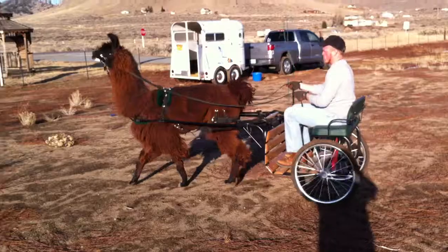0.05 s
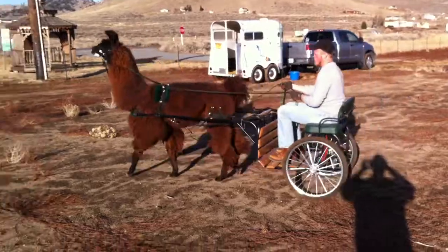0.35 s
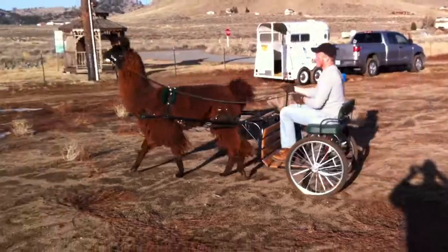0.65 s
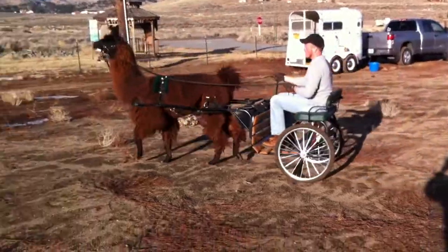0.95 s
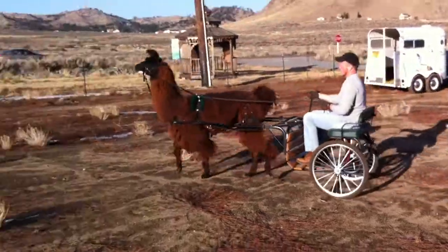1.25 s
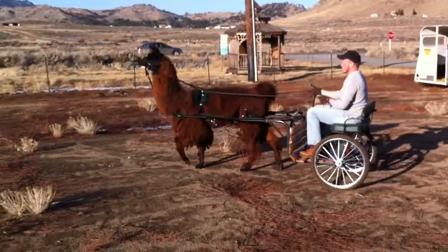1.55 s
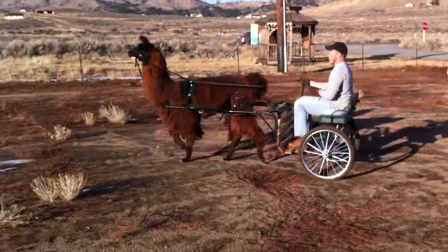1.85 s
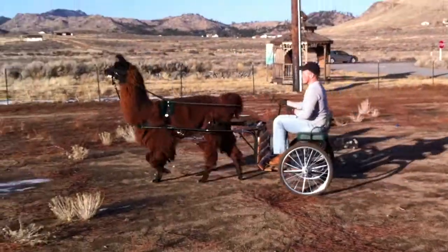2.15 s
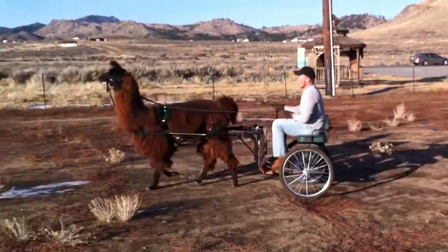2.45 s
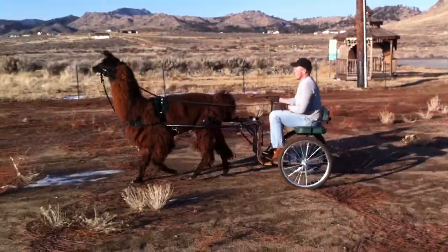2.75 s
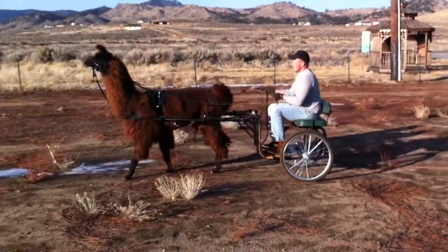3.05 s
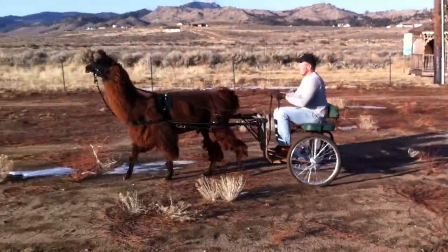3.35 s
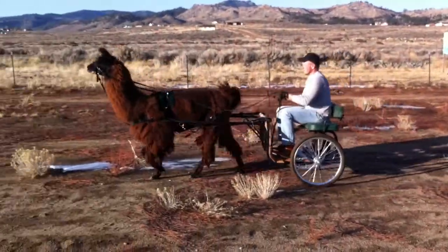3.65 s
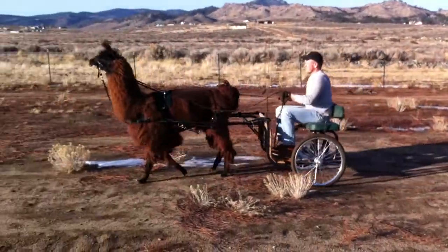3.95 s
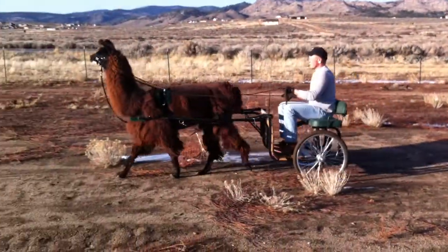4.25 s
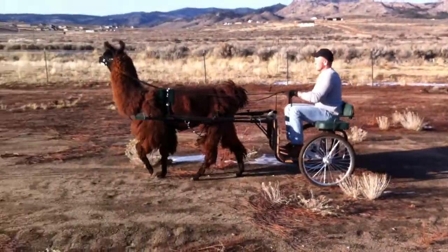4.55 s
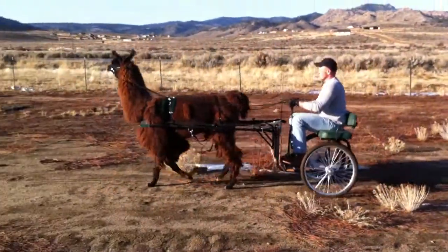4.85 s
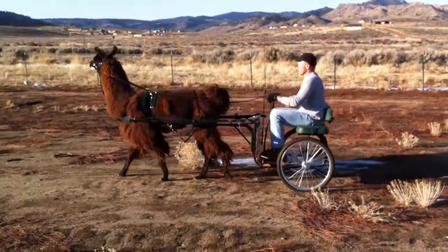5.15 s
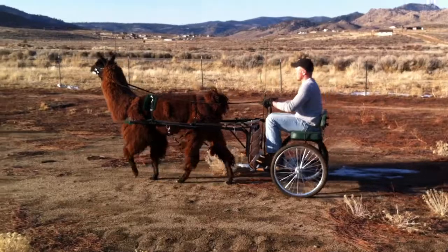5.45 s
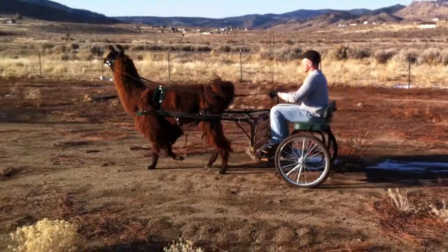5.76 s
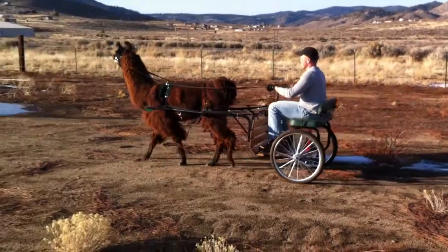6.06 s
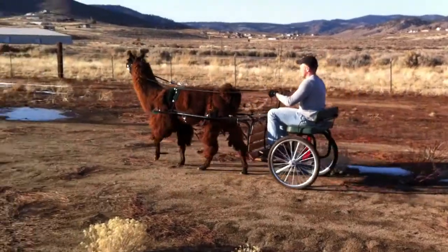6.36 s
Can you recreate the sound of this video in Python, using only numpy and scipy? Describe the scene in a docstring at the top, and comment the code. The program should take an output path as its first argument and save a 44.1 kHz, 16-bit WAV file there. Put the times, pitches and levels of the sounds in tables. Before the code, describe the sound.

From the start, a two-wheeled cart drawn by a llama rolls over a dry dirt lot, with a low rumble, crunching grit, faint swishing weeds and tiny snaps of twigs and stones. The cart knocks lightly over ruts until about 3.4 seconds and judders briefly between 0.8 and 1.7. Padded feet thud softly and unevenly until about 4 seconds, with faint scuffs continuing later. Small harness fittings clink and jingle now and then, clearest near 0.7 and 2.4, ending by 3.8. Behind everything, the tyres of cars roar and hum on a distant road, swelling near 3 seconds and growing duller. The cart slowly becomes softer as it moves away. At about 4.4 seconds the microphone takes one dull knock. Low, irregular wind buffets follow, strongest around 5 seconds and again near 6, over the continuing crunch and traffic until the end at about 6.4.

```python
"""A llama walks a two-wheeled cart over a dry dirt lot, moving off from the microphone.
Padded feet thud and scuff, ruts shake the frame, grit crunches and snaps, harness fittings clink.
Farther off, the tyres of two cars roar on a country road, dulled by air and coloured by the ground.
Near the end the camera takes one knock, and eddies of wind buffet the microphone."""
import sys
import numpy as np
from scipy import signal
from scipy.fft import rfft, irfft
from scipy.io import wavfile
from scipy.ndimage import uniform_filter1d

SR = 44100
rng = np.random.default_rng(int(sys.argv[2]) if len(sys.argv) > 2 else 0)


def materialize(psi):
    """Save the field psi as 16-bit PCM at rate SR to the path in sys.argv[1].

    A 1-D psi becomes a single channel; in a 2-D psi each row is a channel.
    """
    bounded = np.clip(np.atleast_2d(psi).T, -1, 1)
    quanta = np.round(bounded * 32767).astype(np.int16)
    wavfile.write(sys.argv[1], SR, quanta)


N = 283122
TIME = np.arange(N) / SR
FRAME, HOP = 1024, 256  # samples per short-time spectrum, and between spectra
BINS = np.fft.rfftfreq(FRAME, 1 / SR)
FRAME_TIMES = np.arange(N // HOP + 5)[:, None] * HOP / SR


def amp(db):
    """Decibels to gain."""
    return 10 ** (np.asarray(db) / 20)


def unit(x):
    """Scales to an rms of one."""
    return x / np.sqrt(np.mean(x ** 2) + 1e-20)


def colour(points, hz):
    """Reads a spectrum in dB on a log-frequency axis."""
    f, db = np.transpose(points)
    return np.interp(np.log(hz + 1), np.log(f + 1), db)


def follow(rows, t):
    """Reads every column of a curve table at the times t."""
    s, *columns = np.transpose(rows)
    return [np.interp(t, s, c) for c in columns]


def shaped(x, points):
    """Filters x by a spectrum; rms one."""
    gain = amp(colour(points, np.fft.rfftfreq(N, 1 / SR)))
    return unit(irfft(rfft(x) * gain, N))


def add(mix, s, sound):
    """Adds a sound to the mix at time s."""
    part = mix[max(round(s * SR), 0):][:len(sound)]
    part += sound[:len(part)]


def grains(per_s, spread_db):
    """Random clicks, most small and a few large."""
    clicks = (rng.random(N) < per_s / SR) * rng.choice([-1, 1], N)
    sizes = amp(spread_db * np.minimum(rng.exponential(1, N), 4))
    return unit(clicks * sizes)


def flutter(size):
    """Slow random motion of rms one, smooth over size samples."""
    return unit(uniform_filter1d(uniform_filter1d(rng.standard_normal(N), size), size))


def bell(hz, octaves):
    """A bell curve on the log-frequency axis."""
    return np.exp(-.5 * (np.log2((BINS + 1) / hz) / octaves) ** 2)


def band_db(db, lo, hi):
    """Power of short-time spectra between two frequencies, in dB."""
    inside = (BINS > lo) & (BINS < hi)
    return 10 * np.log10((amp(db[:, inside]) ** 2).sum(1, keepdims=True))


def noise_of(db, patchy_db):
    """Noise whose short-time spectra follow a mottled field of dB per bin."""
    real, imag, patches = rng.standard_normal((3, len(FRAME_TIMES), len(BINS)))
    patches = unit(uniform_filter1d(uniform_filter1d(patches, size=18, axis=0), size=4, axis=1))
    spectra = (real + 1j * imag) * amp(db + patchy_db * patches)
    sound = signal.istft(spectra.T, nperseg=FRAME, noverlap=FRAME - HOP)[1][:N]
    return unit(sound) * np.sqrt((amp(db) ** 2).sum(1).mean())


def band_noise(db, hz, octaves):
    """A band of noise around hz at a level in dB per frame."""
    band = 20 * np.log10(bell(hz, octaves) + 1e-6) + np.zeros_like(FRAME_TIMES)
    return noise_of(band - band_db(band, 0, SR / 2) + db, patchy_db=1.5)


def swish(start_s, end_s, level_db, hz, sag_hz_per_s, octaves, fade_s):
    """A band of noise that fades in, holds while its pitch drifts, and fades out."""
    t = FRAME_TIMES
    gate = np.clip(np.minimum(t - start_s, end_s - t) / fade_s, 1e-4, 1)
    pitch = hz - sag_hz_per_s * (np.clip(t, start_s, end_s) - start_s)
    return band_noise(level_db + 20 * np.log10(gate), pitch, octaves)


def burst(hz, octaves, envelope):
    """A puff of noise around hz under an envelope, eased in over one cycle."""
    count = len(envelope)
    f = np.fft.rfftfreq(2 * count, 1 / SR)
    band = np.exp(-.5 * (np.log2((f + 1) / hz) / octaves) ** 2)
    puff = irfft(rfft(rng.standard_normal(count) * envelope, 2 * count) * band)[:count]
    ease = np.sin(np.pi / 2 * np.minimum(np.arange(count) * hz / SR, 1)) ** 2
    return ease * puff / abs(puff).max()


def puffs(rows, gain_db, octaves, rise):
    """Toneless pushes that swell for the share rise of their length, then die."""
    out, t = np.zeros(N), np.arange(SR // 8) / SR
    for s, db, hz, length_s in rows:
        age = t / max(length_s * rise, .001)
        add(out, s, amp(db + gain_db) * burst(hz, octaves, age ** 2 * np.exp(-2 * age)))
    return out


def swings(rows, gain_db, sag, ragged, tail):
    """Low pushes that swing a few times as their pitch sags; tail is decay time over rise time."""
    out, t = np.zeros(N), np.arange(-SR // 16, SR // 16) / SR
    for s, db, hz, cycles in rows:
        age = 2 * t * hz / cycles  # zero at the peak
        envelope = 1 / np.cosh(np.where(age < 0, 2 * age, 2 * age / tail))
        turns = np.cumsum(hz * (1 - sag * np.tanh(age))) / SR + rng.random()
        roughness = ragged * burst(2 * hz, octaves=0.32, envelope=envelope)
        push = envelope * np.sin(2 * np.pi * turns) + roughness
        add(out, s + t[0], amp(db + gain_db) * push * signal.windows.tukey(len(t)))
    return out


def ring(modes, t, detune=0):
    """Decaying modes struck at t = 0; peak one."""
    hz, db, t60 = np.transpose(modes)[:, :, None]
    hz = hz * (1 + detune * rng.standard_normal(hz.shape))
    sound = (amp(db) * np.exp(-np.log(1000) * t / t60) * np.sin(2 * np.pi * hz * t)).sum(0)
    return sound / abs(sound).max()


def chatter(modes, bounce_db, bounce_s):
    """Metal strikes metal and bounces three times, each touch exciting the modes differently."""
    t = np.arange(SR // 5) / SR
    out = np.zeros(len(t))
    gaps = bounce_s * rng.uniform(0.64, 2.4, size=3)
    for k, delay in enumerate(np.append(0, np.cumsum(gaps))):
        touched = [(hz, db + 3 * rng.standard_normal(), t60) for hz, db, t60 in modes]
        add(out, delay, amp(k * bounce_db) * ring(touched, t, detune=0.0048))
    return out


def rattle(modes, length_s, touches_per_s, sag_db):
    """A quick run of uneven touches, each ringing the metal's damped modes anew; peak one."""
    t = np.arange(SR // 12) / SR
    out, count = np.zeros(len(t)), max(round(length_s * touches_per_s), 2)
    for k in range(count):
        delay = (k + rng.random() * (k > 0)) / touches_per_s
        touched = [(hz, db + 3 * rng.standard_normal(), t60) for hz, db, t60 in modes]
        strength = amp(sag_db * k / count + rng.standard_normal())
        add(out, delay, strength * ring(touched, t, detune=0.013))
    return out / abs(out).max()


# Spectrum of the microphone's noise floor: f/Hz, level/dB
HISS_SPECTRUM = [(1000, -33), (4500, -12), (6000, 7), (9000, 1), (11000, 7), (12300, 10), (14000, 2),
                 (15300, 18), (16000, -10)]

def hiss(level_db=-70.0):
    """The microphone's own steady hiss, behind everything."""
    return amp(level_db) * shaped(rng.standard_normal(N), HISS_SPECTRUM)


# Tyre spectra of the two cars, heard from the lot: f/Hz, level/dB
FIRST_TYRES = [(250, -43), (450, -14), (620, -9.5), (800, 0), (1000, -1.5), (1350, 0.5), (1550, -0.5),
               (1850, -3.5), (2250, -7.5), (2700, -16), (3200, -15), (5000, -20.5), (8000, -54)]
SECOND_TYRES = [(250, -23), (500, -18.5), (650, -8.5), (850, -2.5), (1000, 3), (1250, 3.5), (1550, 0.5),
                (1720, -6.5), (1900, -9.5), (2200, -11.5), (2700, -10), (4000, -17), (8000, -50)]
# One car takes over from the other: t/s, share of the second car
SECOND_SHARE = [(3.1, 0.21), (4.4, 0.84)]
# The roar's upper edge, sinking with distance: t/s, f/Hz
AIR_EDGE = [(0, 4110), (1.4, 3250), (2.0, 3000), (2.25, 2700), (2.6, 2900), (3.0, 2360), (3.4, 1820),
            (3.8, 1640)]

def tyres_db(fall_db_per_octave=27):
    """Blended spectra of both cars; the air on the way to the microphone dulls their top."""
    second, = follow(SECOND_SHARE, FRAME_TIMES)
    edge_hz, = follow(AIR_EDGE, FRAME_TIMES)
    blend = (1 - second) * colour(FIRST_TYRES, BINS) + second * colour(SECOND_TYRES, BINS)
    return blend - fall_db_per_octave * np.log2(np.maximum(BINS / edge_hz, 1))


# The roar's hollow-sounding centre: t/s, f/Hz, gain/dB
ECHO_CENTRE = [(0, 1180, -1.5), (.8, 1040, 8), (1.6, 1360, -0.5), (2.6, 1390, 2), (3.15, 1000, -0.5),
               (3.5, 890, 4.5), (4.6, 1100, 1), (5.2, 1320, 6), (6.42, 1330, -1.5)]
# The cancelled band above it: t/s, f/Hz, gain/dB
ECHO_NOTCH = [(2.1, 3700, -17), (2.7, 3320, -12), (3.02, 2730, -11), (3.15, 2600, -18), (3.25, 1300, 0),
              (3.9, 1420, -1), (4.6, 1640, -10.5), (4.95, 1720, -0.5), (5.25, 2470, -4), (5.6, 1880, -5),
              (6.0, 1880, -5.5), (6.42, 2070, -11)]

def ground_echo_db():
    """The echo off the ground between road and microphone colours the roar, drifting as the cars move."""
    centre_hz, height = follow(ECHO_CENTRE, FRAME_TIMES)
    notch_hz, depth = follow(ECHO_NOTCH, FRAME_TIMES)
    return height * bell(centre_hz, octaves=0.28) + depth * bell(notch_hz, octaves=0.13)


# Relative levels of the roar's bands: t/s, core level/dB, bright edge level/dB, low flank level/dB
ROAR_LEVELS = [(0.0, -45.5, -55, -59), (0.85, -46.5, -54, -54.5), (1.38, -45.5, -49.5, -50),
               (1.9, -43, -53, -55), (2.0, -41.5, -47.5, -54), (2.25, -47, -59, -49),
               (2.55, -40.5, -49.5, -46), (2.75, -39.5, -53.5, -47.5), (2.94, -37, -53.5, -47),
               (3.04, -41, -57.5, -53.5), (3.46, -46.5, -61.5, -45.5), (3.89, -48, -55.5, -53.5),
               (4.0, -44, -58.5, -54), (4.28, -48, -60, -53), (4.58, -43, -63, -58),
               (4.89, -46.5, -66, -57), (5.28, -43, -62.5, -55.5), (5.65, -43, -63.5, -57.5),
               (6.0, -45.5, -61.5, -55), (6.27, -44, -59.5, -56.5), (6.42, -45, -62.5, -52)]
# Soft ground swallowing the low middle: t/s, f/Hz, gain/dB
SOFT_GROUND = [(0, 520, -3), (1.4, 490, -4), (2.0, 431, -15), (2.8, 445, -15), (3.4, 450, -21),
               (4.0, 375, -3), (4.6, 440, 5)]

def road(gain_db=-0.9, edge_gain_db=1.08, flank_gain_db=-2.0):
    """Tyre roar from the road beyond the lot, mottled by turbulence on its way over."""
    core, edge, flank = follow(ROAR_LEVELS, FRAME_TIMES)
    hollow_hz, hollow_db = follow(SOFT_GROUND, FRAME_TIMES)
    db = tyres_db() + ground_echo_db()
    # the core carries the level; the bands on either side swell against it
    db += core - band_db(db, 850, 1700)
    brighter = edge - band_db(db, 1900, 3200) + edge_gain_db
    fuller = flank - band_db(db, 600, 850) + flank_gain_db
    db += brighter * colour([(1600, 0.0074), (2050, 0.89)], BINS)
    db += fuller * colour([(450, 0.19), (620, 1.0), (780, 1), (950, 0.01)], BINS)
    db += hollow_db * bell(hollow_hz, octaves=0.12)
    return noise_of(db + gain_db, patchy_db=1.24)


def car_drone(closest_s=2.83, passing_s=0.11, level_db=-52):
    """The first car's low drone reaches the microphone only while it is closest."""
    distance_db = -10 * np.log10(1 + ((FRAME_TIMES - closest_s) / passing_s) ** 2)
    return band_noise(level_db + distance_db, hz=290, octaves=0.19)


# Tread singing out on the road: start/s, end/s, level/dB, f/Hz, sag/(Hz/s), width/octaves
TREAD_BANDS = [(0.733, 1.603, -51, 938, 15, 0.024), (1.05, 2.15, -52, 1330, 34, 0.032),
               (2.99, 3.758, -49, 982, 0, 0.042), (3.705, 4.863, -54, 985, 0, 0.015),
               (3.95, 4.848, -56, 1267, 0, 0.038), (5.146, 5.55, -51, 1000, 0, 0.022),
               (5.192, 6.253, -52.5, 1253, 0, 0.058), (5.297, 6.425, -54, 1433, -40, 0.037)]

def tread():
    """The tread of the cars' tyres hums in narrow, wavering bands."""
    return sum(swish(*band, fade_s=0.16) for band in TREAD_BANDS)


# Eddies right at the microphone: t/s, relative level/dB, f/Hz, length/cycles
EDDIES = [(4.434, -49, 147, 2.7), (4.548, -34.5, 185.2, 1.2), (4.619, -41, 129, 1.8),
          (4.711, -35.5, 280, 2.3), (4.729, -30, 172.8, 3.2), (4.775, -47, 178, 3.9),
          (4.868, -41, 164.4, 1.8), (4.887, -36, 285, 3.9), (4.899, -29.5, 174, 3.8),
          (4.933, -29, 202.5, 1.2), (5.005, -20.5, 166.7, 1.3), (5.021, -25, 267.3, 2.7),
          (5.033, -30, 221.7, 2.7), (5.086, -39, 201, 3.5), (5.118, -29.5, 196.7, 2.2),
          (5.143, -38, 191, 7), (5.184, -40, 155.3, 3.1), (5.245, -49, 141, 2.8),
          (5.437, -39.5, 166.5, 1.3), (5.468, -36, 153, 2.3), (5.529, -45, 160.6, 3.5),
          (5.607, -48, 201, 1.7), (5.654, -39.5, 137.4, 2.8), (5.774, -39, 172, 2.1),
          (5.794, -41, 172, 2.6), (5.839, -42, 153, 2), (5.87, -32, 164, 3.6), (5.91, -34.5, 155.4, 2.3),
          (5.954, -40.5, 197, 4.4), (5.986, -30, 155, 2), (6.0, -42, 334, 3), (6.053, -32.5, 179, 1.1),
          (6.173, -37.5, 187, 2.7), (6.206, -39, 154, 1.3), (6.275, -50, 145, 6.6),
          (6.351, -38.5, 170, 2.1)]
# Spectrum of the turbulence around them: f/Hz, level/dB
WAKE_SPECTRUM = [(20, 7), (50, -15), (100, 5.5), (150, 4), (220, -6.5), (320, -8), (450, -28), (900, -52)]

def wind(wake_db=-47.5, wake_s=0.026, pivot_db=-41, growth=0.57, lumpy_db=3.5):
    """Each eddy swings the diaphragm in a wake of lumpy turbulence that grows with its strength."""
    wakes = [amp(wake_db + growth * (db - pivot_db)) * np.exp(-.5 * ((TIME - s) / wake_s) ** 2)
             for s, db, _, _ in EDDIES]
    turbulence = shaped(rng.standard_normal(N) * amp(lumpy_db * flutter(size=500)), WAKE_SPECTRUM)
    pushes = swings(EDDIES, gain_db=0.5, sag=0.1202, ragged=0.11, tail=0.81)
    return turbulence * np.max(wakes, axis=0) + pushes


# A knock on the camera: t/s, level/dB
CASE_TAPS = [(4.3862, -23)]
# Modes of its case: f/Hz, level/dB, t60/s
CASE_MODES = [(820, 23, 0.0044), (1700, 10, 0.0045), (2750, -5, 0.0026), (193, 10, 0.022)]

def camera_knock():
    """A dull, quickly damped tap reaches the microphone through the camera's case."""
    out, t = np.zeros(N), np.arange(SR // 20) / SR
    for s, db in CASE_TAPS:
        add(out, s, -amp(db) * ring(CASE_MODES, t))
    return out


# Weeds and dirt on the lot: start/s, end/s, level/dB, f/Hz, sag/(Hz/s), width/octaves
WEED_SCRAPES = [(0, .14, -60, 3840, 4, 0.3), (.15, .5, -67, 3580, 0, 0.15),
                (0.7, 1.597, -64.5, 3620, 102, 0.28), (1.146, 2.113, -65.5, 9400, 1200, 0.2),
                (1.845, 2.1, -66, 5000, 0, 0.57), (2.7, 3.023, -66.5, 4400, -3, 0.27),
                (3.023, 3.445, -68.5, 3860, 0, .22), (3.142, 3.346, -47.5, 1330, 0, 0.32),
                (4.22, 4.63, -66, 4450, 0, 0.73), (5.09, 5.415, -69.5, 3300, 0, 0.14)]

def weeds(catch_db=0.5):
    """Dry stalks and loose dirt swish along the wheels, catching and letting go."""
    swishes = sum(swish(*scrape, fade_s=0.065) for scrape in WEED_SCRAPES)
    return swishes * unit(amp(catch_db * flutter(size=90)))


# Sand crackling under the cart's tyres and the feet: t/s, level/dB
SAND_LEVEL = [(0, -73), (.6, -69), (1.3, -66), (1.7, -67), (2.15, -67.5), (2.7, -68), (3.1, -77),
              (3.8, -68), (4.5, -65.5), (4.85, -73), (5.3, -69), (5.7, -68), (6.05, -87), (6.42, -74)]
# The tick of each size of grain: f/Hz, relative level/dB
GRAIN_TICKS = [(3900, 1), (5600, -1.5), (7200, -10), (8800, -9), (10400, -5.5), (12600, -4), (14800, 2)]

def sand(clump_db=3.5, grain_s=0.00077):
    """Sand grains crack in clumps; each size of grain ticks at its own pitch."""
    ticks, t = np.zeros(N), np.arange(SR // 200) / SR
    clumps = amp(clump_db * flutter(size=700))
    for hz, db in GRAIN_TICKS:
        cracks = grains(per_s=750, spread_db=2.5) * clumps
        tick = burst(hz, octaves=0.2, envelope=np.exp(-t / grain_s))
        ticks += amp(db) * unit(signal.oaconvolve(cracks, tick)[:N])
    level_db, = follow(SAND_LEVEL, TIME)
    return unit(ticks) * amp(level_db)


# Stones and dry twigs breaking on the lot: t/s, relative level/dB, f/Hz
GROUND_SNAPS = [(.2074, -48, 12800), (.8625, -50, 13000), (1.2245, -52, 10000), (1.671, -47.5, 8900),
                (1.907, -52, 8200), (2.4074, -49, 14800), (2.4199, -42, 15400), (2.4423, -51, 12700),
                (2.4624, -41, 15000), (2.819, -46, 15000), (3.408, -41, 10200), (3.9937, -56, 7400),
                (5.1701, -50, 15000), (5.3994, -50, 15700), (5.676, -53, 7100), (5.68, -49, 13000),
                (5.8556, -46, 15100), (5.8674, -49, 15500), (5.922, -54, 5540), (5.923, -42, 14500),
                (6.0376, -46.5, 15600)]

def snaps(gain_db=6, crack_s=0.0013, crumble_db=-17, crumble_s=0.014):
    """A stone or twig gives with a sharp, bright crack and a short crumbling after it."""
    out, t = np.zeros(N), np.arange(SR // 25) / SR
    envelope = np.exp(-t / crack_s) + amp(crumble_db) * np.exp(-t / crumble_s)
    for s, db, hz in GROUND_SNAPS:
        add(out, s, amp(db + gain_db) * burst(hz, octaves=0.38, envelope=envelope))
    return out


def judder():
    """Ribbed ground keeps the cart's frame humming for a moment."""
    return swish(start_s=0.84, end_s=1.68, level_db=-54.5, hz=234,
                 sag_hz_per_s=25, octaves=0.21, fade_s=0.15)


# Knocks of the frame while the cart is still near: t/s, relative level/dB, f/Hz
FRAME_BUMPS = [(.124, -34, 480), (.205, -38, 445), (.308, -47, 450), (.42, -46, 400), (.751, -43, 330),
               (.856, -43, 337), (.919, -39.5, 486), (.993, -41, 420), (1.568, -37, 600), (1.646, -40, 520),
               (1.818, -33, 650), (1.928, -36, 670), (2.455, -39, 630), (2.47, -31, 1260), (2.9, -40, 710),
               (3.224, -29.5, 745), (3.226, -33, 1130), (3.367, -37, 706)]

def bumps(cycles=3.9):
    """The frame knocks over bumps; higher knocks die sooner."""
    knocks = [(s, db, hz, cycles / hz) for s, db, hz in FRAME_BUMPS]
    return puffs(knocks, gain_db=-3, octaves=0.33, rise=0.27)


# The cart rolls off onto smoother ground: t/s, relative rumble level/dB, relative crunch level/dB
CART_LEVELS = [(0, -50, -63.5), (.55, -52, -63), (1.0, -49.5, -62), (1.3, -58.5, -62.5), (1.7, -50.5, -64),
               (2.05, -52.5, -69), (2.2, -48.5, -64.5), (2.4, -52, -62), (2.6, -55, -63),
               (3.15, -54, -63.5), (3.6, -54.5, -63), (4.45, -59, -65), (4.8, -57.5, -66), (5.65, -57, -66),
               (6.1, -53.5, -70), (6.42, -51, -69)]
# Spectra of the ruts' rumble, the frame's boom and the dirt's crunch: f/Hz, level/dB
RUT_SPECTRUM = [(20, -3), (45, -14), (80, -7.5), (125, 0.5), (190, 3.5), (250, -3.5), (330, -18.5),
                (500, -20), (1000, -83)]
FRAME_SPECTRUM = [(100, -68), (195, -11), (228, 5), (290, -2), (350, -1.5), (450, -5), (520, -5.5),
                  (600, -9), (800, -18), (1600, -77)]
DIRT_SPECTRUM = [(1000, -28), (2400, 5.5), (3200, 9.5), (3900, 5), (4900, 4.5), (5700, 8.5), (7000, 5),
                 (9000, 5), (11000, -4), (12300, 2.5), (14000, -9), (15300, -5), (16000, -12)]

def cart(rumble_gain_db=0.37, crunch_gain_db=-0.5, boom_db=-50.5, fade_db_per_s=5,
         grit_db=-4, clump_db=3.5, uneven_db=2.0):
    """Ruts shake the frame, whose boom fades with distance; tyres and feet crush clumps of dry dirt."""
    rumble_db, crunch_db = follow(CART_LEVELS, TIME)
    ruts = shaped(grains(per_s=900, spread_db=1.0), RUT_SPECTRUM) * amp(rumble_db + rumble_gain_db)
    boom = shaped(grains(per_s=820, spread_db=2.0), FRAME_SPECTRUM) * amp(boom_db - fade_db_per_s * TIME)
    dust = shaped(rng.standard_normal(N), DIRT_SPECTRUM)
    grit = shaped(grains(per_s=1100, spread_db=1.0) * amp(clump_db * flutter(size=600)), DIRT_SPECTRUM)
    crunch = (dust + amp(grit_db) * grit) * amp(crunch_db + crunch_gain_db)
    uneven_ground = amp(uneven_db * flutter(size=4000))
    return uneven_ground * (ruts + boom) + crunch


# A harness buckle, near the microphone: t/s, level/dB, length/s, clack offset/dB, free ring offset/dB
BUCKLE_SHAKES = [(0.074, -44.5, .012, -1, -26), (0.7437, -34, 0.019, -1.5, -18),
                 (1.04, -41, 0.014, -7, -16), (2.351, -37, 0.014, -14, -16), (2.882, -40.5, 0.018, -1, -26)]
# Modes of the buckle and of the heavier strap fitting it hangs on: f/Hz, level/dB, t60/s
BUCKLE_MODES = [(6650, 5, 0.0097), (7500, -10, 0.025), (7520, 1, 0.039), (8100, -3, 0.055), (8600, 3, .01),
                (11980, 1, 0.025), (12300, -4, .018), (12900, 0, .012), (14900, -7, .008)]
FITTING_MODES = [(2010, 0, 0.025), (2157, 5.5, 0.017), (2730, -2, 0.027), (3140, -5, 0.015)]

def buckle(fitting_gain_db=3.0, free_hz=11560, free_t60_s=0.11):
    """The buckle rattles, shakes a dull clack from its fitting, then swings free and rings on."""
    out, t = np.zeros(N), np.arange(SR // 6) / SR
    free_ring = ring([(free_hz, 0, free_t60_s)], t)
    for s, db, length_s, clack_db, free_db in BUCKLE_SHAKES:
        clink = rattle(BUCKLE_MODES, length_s, touches_per_s=800, sag_db=-9.5)
        clack = rattle(FITTING_MODES, length_s, touches_per_s=450, sag_db=-4)
        add(out, s, amp(db) * (clink + amp(clack_db + fitting_gain_db) * clack))
        add(out, s + length_s, amp(db + free_db) * free_ring)
    return out


# A small ring on the llama's rein: t/s, relative level/dB, hardness/(dB/octave)
REIN_HITS = [(0.379, -44.5, -12), (.422, -41, -17), (.4529, -45, -8), (.6344, -48, 28), (1.0193, -41, 5),
             (1.5873, -43, 46), (2.282, -40, 50), (2.315, -47, -12), (2.922, -46, 22), (2.945, -46, 50),
             (2.961, -47, 22), (3.7658, -47, -1)]
# Its modes: f/Hz, level/dB, t60/s
REIN_MODES = [(10100, 15, 0.052), (10400, -7, 0.034), (10500, -8, .02), (15000, -7, 0.087),
              (15165, -15, .04)]

def rein_ring(jingle_db=-6, tick_db=-7, tick_s=0.004):
    """The ring ticks and jingles as it bounces, brighter when hit harder."""
    out, t = np.zeros(N), np.arange(SR // 6) / SR
    lowest_hz = REIN_MODES[0][0]
    for s, db, hardness in REIN_HITS:
        modes = [(hz, level + hardness * np.log2(hz / lowest_hz), t60) for hz, level, t60 in REIN_MODES]
        add(out, s, amp(db + jingle_db) * chatter(modes, bounce_db=-3.5, bounce_s=0.007))
        add(out, s, amp(db + tick_db) * burst(lowest_hz, octaves=0.52, envelope=np.exp(-t / tick_s)))
    return out


# Feet and wheels landing on the dirt in the foreground: t/s, relative level/dB, f/Hz
DIRT_THUDS = [(0.127, -46, 242), (.268, -38, 186.5), (0.306, -36, 252), (0.349, -38, 174),
              (0.756, -38, 264.3), (.859, -34.5, 252), (1.023, -36, 197), (1.127, -35.5, 158),
              (1.57, -37, 133), (1.66, -35, 177.7), (1.715, -39, 167), (1.933, -32.5, 168),
              (2.073, -32.5, 188), (2.366, -38, 184.4), (2.472, -34, 200.7), (2.573, -35, 182.3),
              (2.812, -40, 249), (3.132, -39, 185.5), (3.235, -46, 171), (3.389, -43, 192),
              (3.489, -40, 160), (3.748, -37, 173), (3.768, -34.5, 129.4), (3.796, -42, 146),
              (3.907, -39.5, 168), (3.979, -41, 156), (4.048, -40.5, 159.6)]
# Feet brushing the grit: t/s, relative level/dB
FOOT_SCUFFS = [(0.699, -63), (2.005, -62), (2.66, -66), (3.405, -65), (3.6, -68), (3.83, -65), (3.99, -69),
               (4.29, -65), (4.39, -68), (5.39, -68), (5.825, -69)]

def feet(thud_cycles=1.46, scuff_hz=8400, scuff_s=0.026):
    """The llama's padded feet and the wheels thud on the dirt; the feet scuff its grit."""
    landings = [(s, db, hz, thud_cycles) for s, db, hz in DIRT_THUDS]
    brushes = [(s, db, scuff_hz, scuff_s) for s, db in FOOT_SCUFFS]
    thuds = swings(landings, gain_db=-2.0, sag=0.14, ragged=0.17, tail=2.2)
    scuffs = puffs(brushes, gain_db=14.0, octaves=0.3, rise=0.59)
    return thuds + scuffs


def scene():
    """One microphone on the lot: the road beyond, wind at the diaphragm, cart and llama in front."""
    traffic = road() + car_drone() + tread()
    wheels = cart() + judder() + bumps() + weeds() + sand() + snaps()
    buffeting = wind()
    llama = feet() + buckle() + rein_ring()
    return (traffic + wheels + buffeting + llama + camera_knock() + hiss())[None]


def record(dry, low_cut_hz=75, high_cut_hz=15950):
    """The microphone's wind filter, then the recorder's band limit."""
    wind_filter = signal.butter(2, low_cut_hz, "highpass", fs=SR, output="sos")
    band_limit = signal.firwin(511, high_cut_hz, window=("kaiser", 8), fs=SR)
    return signal.oaconvolve(signal.sosfilt(wind_filter, dry), band_limit[None], "same")


dry = scene()
out = record(dry)
materialize(out)
```